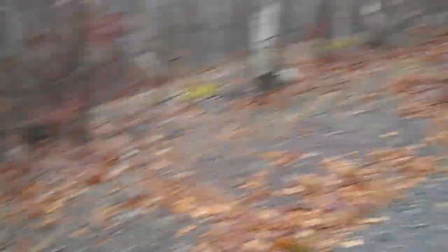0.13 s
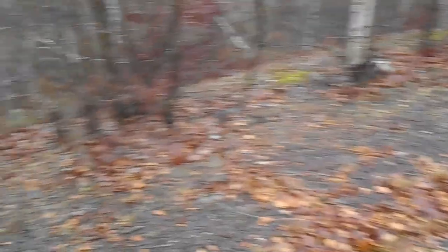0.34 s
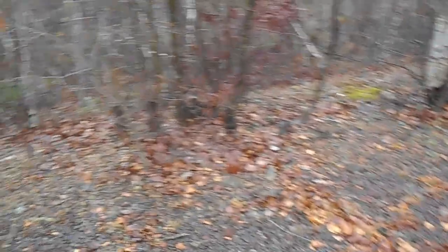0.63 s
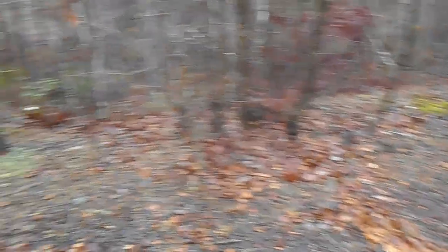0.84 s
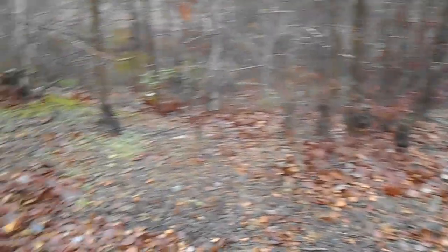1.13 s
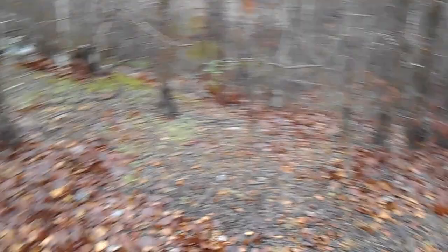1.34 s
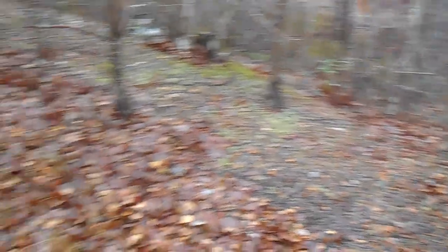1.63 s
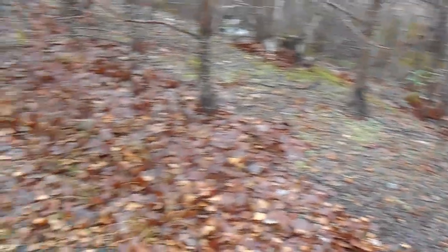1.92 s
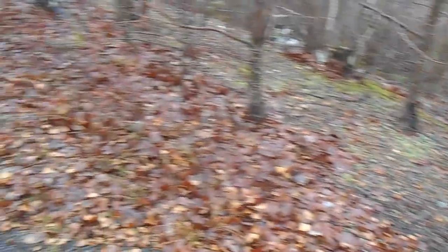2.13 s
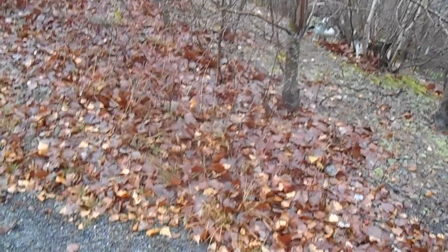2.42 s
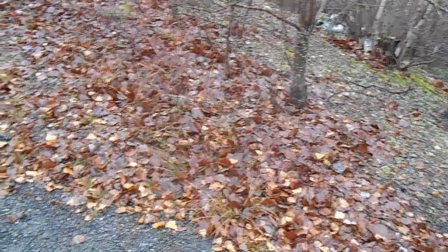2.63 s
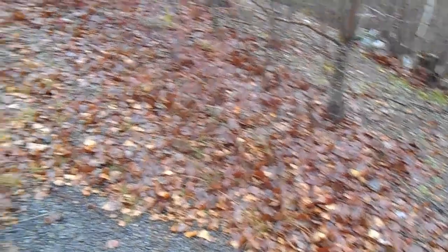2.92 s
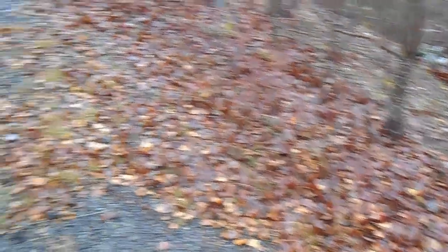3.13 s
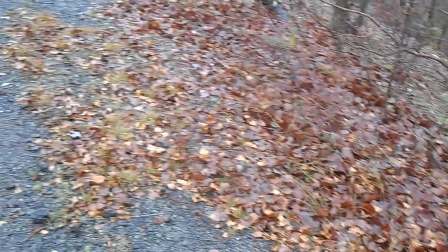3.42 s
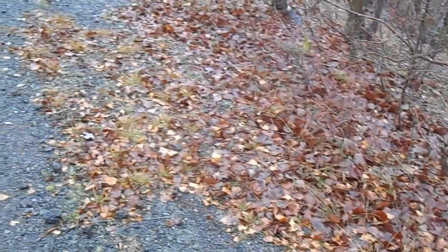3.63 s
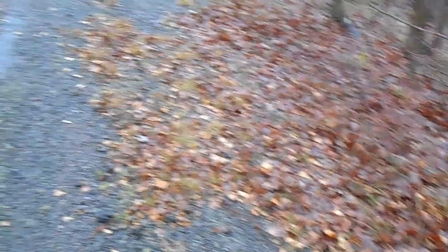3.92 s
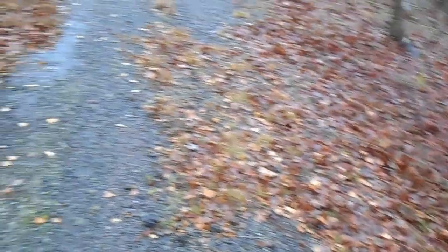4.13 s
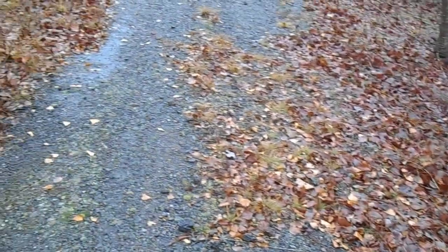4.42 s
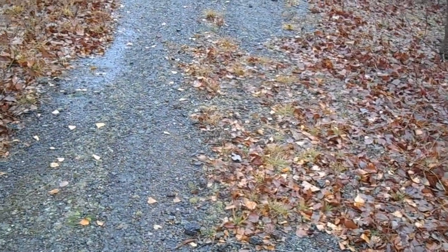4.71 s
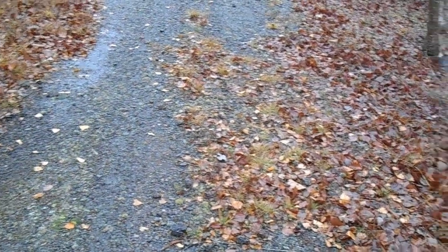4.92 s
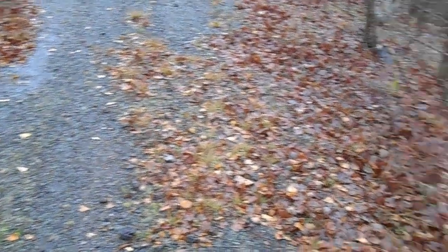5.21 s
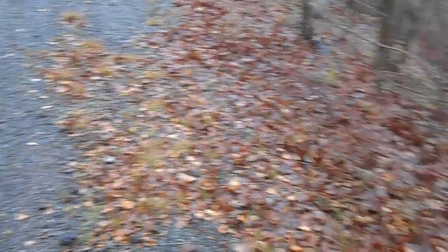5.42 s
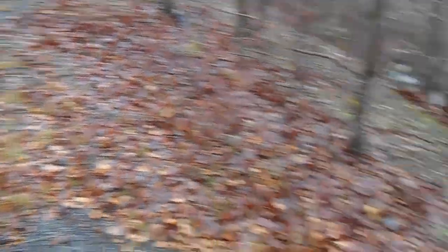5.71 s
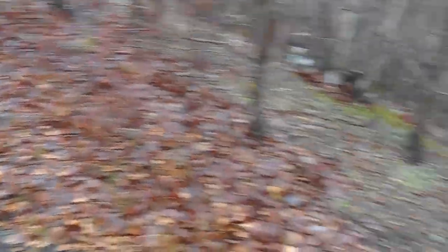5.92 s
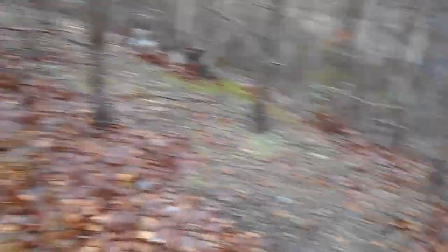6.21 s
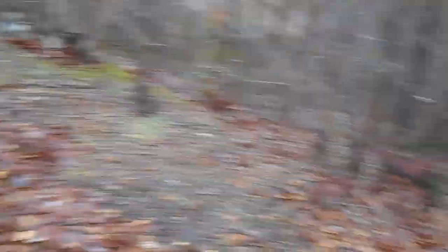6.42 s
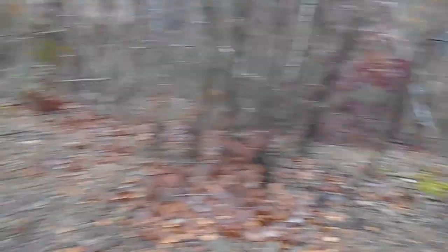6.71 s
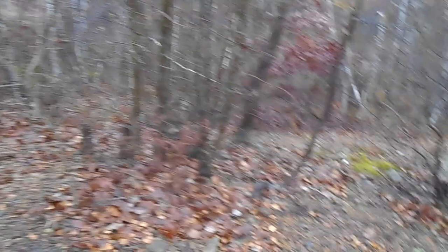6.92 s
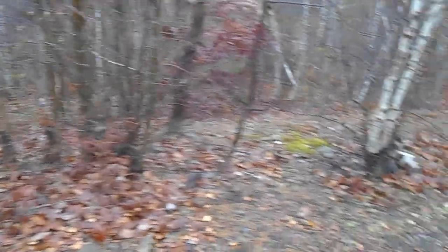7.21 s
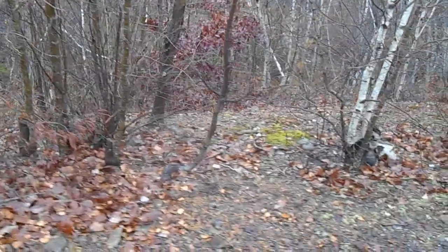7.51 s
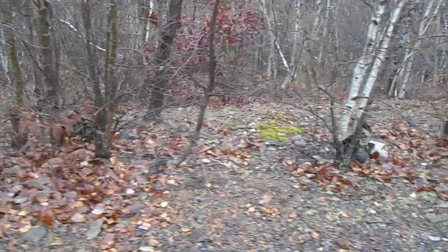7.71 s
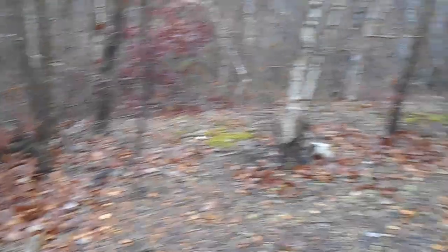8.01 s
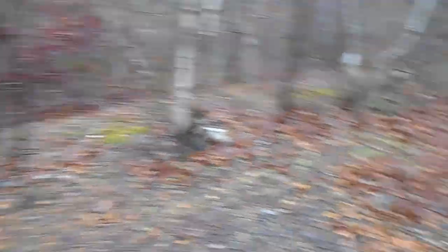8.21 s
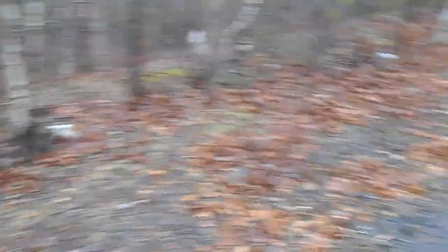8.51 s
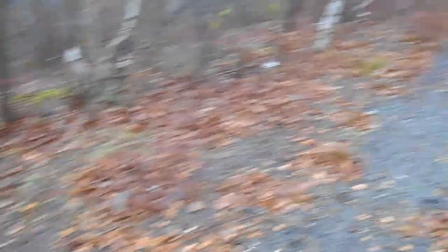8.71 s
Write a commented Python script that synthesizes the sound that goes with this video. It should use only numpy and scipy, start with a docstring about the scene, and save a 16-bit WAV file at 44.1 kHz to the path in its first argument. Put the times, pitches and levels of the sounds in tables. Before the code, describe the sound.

Close to a hand-held microphone outdoors, cloth like a rain jacket snaps, swishes and zips quickly up in pitch, followed by a sharp tap from a heavy drop and a short dull scrape. Around it, even rain hisses on woods and track, with scattered leaf pats and bright gravel ticks. Air rumbles quietly underneath, and soft thumps gather in the last second, both channels identical.

```python
"""Steady rain in bare woods: a far hiss, with nearer drops patting on soaked leaves and ticking on gravel.
Early on, ribbed cloth like a rain jacket snaps, swishes and zips upward close to the hand-held microphone;
a dull rustle follows. Air rumbles throughout, and the heaviest bumps on the microphone come near the end.
Filtered noise makes the hiss, patter and air; damped knocks make the drops and bumps; noise bands and
tones that follow the rib rate make the zip. One microphone, the same signal in both channels."""
import sys
import numpy as np
from scipy import signal
from scipy.io import wavfile

SR = 44100
rng = np.random.default_rng(int(sys.argv[2]) if len(sys.argv) > 2 else 0)


def persist_wave(psi):
    """Save psi, clipped to +-1, as 16-bit WAV."""
    counts = np.round(np.clip(psi, -1, 1) * 32767).astype(np.int16)
    wavfile.write(sys.argv[1], SR, np.atleast_2d(counts).T)


N = 390726
TIME = np.arange(N) / SR

# Air over the microphone, spectrum: f/Hz, relative density/dB per Hz
AIR_SPECTRUM = [(20, 0.5), (40, -5), (70, -9), (120, -14.5), (250, -22.5), (500, -35.5)]
# Gusts, before the air trim: t of the height/s, length/s, level/dB
AIR_GUSTS = [(.15, .35, -55), (.74, 0.23, -51), (1.0, 0.14, -53), (1.8, 0.24, -57.5), (3.5, .5, -60),
             (5.04, .35, -56.5), (6.07, .1, -57), (8.08, .26, -47), (8.46, 0.44, -53.5), (8.81, 0.18, -39)]
# Bumps on the microphone: t of the peak/s, peak level/dB, f/Hz
MICROPHONE_BUMPS = [(1.047, -45, 55), (8.049, -34, 115), (8.397, -42, 60), (8.477, -39, 70),
                    (8.7542, -25, 215), (8.781, -27.5, 190), (8.856, -30, 129)]
# Resonances of the microphone housing: f/Hz, width/Hz, boost/dB
HOUSING_RESONANCES = [(860, 180, 2.5), (1380, 160, 3), (2350, 130, 1), (3460, 260, 1.5)]

# Cloth brushing close by, spectrum: f/Hz, relative density/dB per Hz
BRUSH_SPECTRUM = [(800, -15), (2500, 7.5), (4700, 7), (7000, 3), (8200, -10.5)]
# Cloth fibres scratching, spectrum: f/Hz, relative density/dB per Hz
FIBRE_SPECTRUM = [(300, -9), (900, -14), (1800, 0.5), (2700, 5), (4000, -20), (5000, -5), (6600, -3.5),
                  (8200, -29)]
# Folds rubbing at other rates: f/multiple of the rib rate, level/dB relative to the scratch before trim
CLOTH_FOLDS = [(0.551, -10.5), (1.421, -5.5), (2, -6), (2.9, -7.5)]
# Ribs locking into a whistle at speed: t of the height/s, length/s, level/dB
RIB_WHISTLES = [(.358, 0.01, -28), (.374, 0.016, -28)]

# Rain as the microphone turns between leaves and track, all before the layer trims:
# t/s, far hiss level/dB, dull patter level/dB, distinct pats level/dB
RAIN_LEVELS = [(0.42, -49, -52.5, -52), (1.27, -50.5, -57.5, -53.5), (1.43, -49, -57, -54.5),
               (2.66, -50, -60, -57), (2.98, -50, -57, -58), (4.38, -50.5, -60.5, -58),
               (5.98, -50, -64, -58.5), (6.55, -50.5, -60.5, -58), (7.66, -50, -61.5, -55.5),
               (7.98, -50.5, -60.5, -59.5), (8.7, -49.5, -60.5, -55)]
# Brief showers of drips on the leaves, before the layer trims: t of the height/s, length/s, level/dB
DRIP_SHOWERS = [(2.22, 0.69, -57), (3.08, 0.23, -55), (7.55, 0.28, -59), (8.38, .2, -55.5)]
# Far rain, spectrum: f/Hz, relative density/dB per Hz
HISS_SPECTRUM = [(100, -8), (240, -9), (450, -10), (800, -4), (1150, -4.5), (1800, 0), (2400, 0.85),
                 (3300, 3.5), (4300, -1), (5600, -1), (7000, -4.5), (8200, -24.5)]
# Many pats further off, run together, spectrum: f/Hz, relative density/dB per Hz
PATTER_SPECTRUM = [(150, -6), (300, -4), (550, 1.5), (900, -6), (1400, -9), (2500, -14)]
# Scattered pats, loudness by pitch: f/Hz, relative level/dB
PAT_LOUDNESS = [(380, -6.5), (520, -4.5), (850, 3), (1300, 3), (2000, -0.5)]
# Near drops on soaked leaves: t/s, level before trim/dB, f/Hz
NEAR_LEAF_DROPS = [(0.074, -27.5, 1360), (0.083, -27.5, 740), (0.263, -34, 1030), (0.573, -37, 557),
                   (1.027, -34.5, 861), (1.053, -28.5, 575), (1.428, -32, 1430), (1.443, -29.5, 1820),
                   (1.462, -34.5, 756), (1.844, -32, 1600), (1.883, -33, 926), (2.118, -32, 528),
                   (2.271, -36, 517), (2.865, -33.5, 934), (3.022, -35, 759), (3.212, -29, 740),
                   (3.221, -33, 1690), (3.428, -34.5, 595), (3.878, -36, 899), (4.056, -34, 1000),
                   (4.417, -37.5, 720), (4.565, -33, 888), (4.594, -33, 1120), (6.463, -37, 1480),
                   (6.474, -33, 974), (6.799, -35, 2300), (7.174, -30, 934), (7.914, -30.5, 830),
                   (8.079, -30.5, 1550), (8.264, -34, 820), (8.508, -29, 1990), (8.558, -32, 1320)]
# Near drops on gravel: t/s, level before trim/dB, f/Hz
NEAR_GRAVEL_DROPS = [(1.9879, -30.5, 3260), (3.0396, -26.5, 5500), (3.0855, -31, 5300), (3.1202, -24, 6000),
                     (3.34, -27.5, 4870), (3.4809, -27, 3730), (3.6376, -32, 4970), (4.2786, -35, 3430),
                     (5.2995, -28.5, 3420), (6.474, -28, 3130), (8.313, -32, 3530)]
# Hard thing close by, ringing under one heavy drop: f/Hz, relative level/dB, decay by 60 dB/s
HARD_SURFACE_MODES = [(816, -10, 0.0095), (2040, 1, .007), (3600, -11.5, 0.01)]


def from_db(db):
    """Decibels to gain."""
    return 10 ** (np.asarray(db) / 20)


def rms_one(x):
    """Scale to rms 1."""
    return x / np.sqrt(np.mean(x ** 2) + 1e-20)


def in_time(rows):
    """The columns of a curve at every sample."""
    s, *columns = np.transpose(rows)
    return [np.interp(TIME, s, c) for c in columns]


def at_hz(points, hz):
    """Read a spectrum on a log-frequency axis."""
    f, level = np.transpose(points)
    return np.interp(np.log(hz), np.log(f), level)


def add(out, s, sound):
    """Mix a sound in at a time."""
    i = max(int(s * SR), 0)
    out[i:i + len(sound)] += sound[:max(N - i, 0)]


def envelope(start_s, attack_s, hold_s, release_s):
    """Straight attack, hold and release; height 1."""
    corners = start_s + np.cumsum([0, attack_s, hold_s, release_s])
    return np.interp(TIME, corners, [0, 1, 1, 0])


def swells(rows):
    """Bell-shaped swells of gain, each with its time, length and level."""
    total = 0
    for s, length, db in rows:
        bell = np.exp(-np.minimum((2 * (TIME - s) / length) ** 2, 20))
        total = total + from_db(db) * bell
    return total


def drift(rate_hz):
    """Slow random wandering of spread 1: noise through a two-pole low-pass."""
    step = 40   # drawn at every 40th sample, joined by straight lines
    r = np.exp(-2 * np.pi * rate_hz * step / SR)
    white = rng.standard_normal(N // step + 2002)
    slow = signal.lfilter([1], [1, -2 * r, r * r], white)[2000:]   # drop the filter's run-in
    return np.interp(np.arange(N) / step, np.arange(len(slow)), rms_one(slow))


def banded_noise(spectrum, flicker_db, flicker_hz):
    """Third-octave bands of noise, each flickering by itself; rms 1."""
    out, white = 0, rng.standard_normal((2, N))
    edges = np.geomspace(20, 10000, 28)
    for k, (low, high) in enumerate(zip(edges, edges[1:])):
        hz = np.sqrt(low * high)
        if spectrum[0][0] / 2 < hz < spectrum[-1][0] * 2:
            sos = signal.butter(2, [low, high], "band", fs=SR, output="sos")
            band = signal.sosfilt(sos, white[k % 2])   # neighbours use separate noise
            out = out + band * from_db(at_hz(spectrum, hz) + flicker_db * drift(flicker_hz))
    return rms_one(out)


def gliding_noise(hz, width_hz):
    """A narrow band of noise that follows a moving pitch; rms about 1."""
    phase = 2 * np.pi * np.cumsum(hz) / SR
    return drift(width_hz) * np.sin(phase) + drift(width_hz) * np.cos(phase)


def blip(hz, rise_cycles, phase):
    """A heavily damped knock: its envelope swells to 1 within a cycle or few, then dies away."""
    rise = rise_cycles / hz
    t = np.arange(int(8 * rise * SR) + 2) / SR
    push = (t / rise * np.exp(1 - t / rise)) ** 2
    return push * np.cos(2 * np.pi * hz * (t - rise) + phase)


def spray(decay_s):
    """A short bright noise burst that dies at once."""
    t = np.arange(SR // 40) / SR
    bright = signal.butter(1, [1500, 7000], "band", fs=SR, output="sos")
    return signal.sosfilt(bright, rng.standard_normal(len(t))) * np.exp(-t / decay_s)


def microphone_rumble(air_trim_db, cycles):
    """Lumpy low air noise swells in gusts; soft bumps push on the microphone as damped knocks."""
    calm_db = -61.5   # between gusts, before the trim
    air_gain = from_db(air_trim_db) * np.hypot(from_db(calm_db), swells(AIR_GUSTS))
    out = air_gain * banded_noise(AIR_SPECTRUM, flicker_db=3.0, flicker_hz=6)
    for s, db, hz in MICROPHONE_BUMPS:
        add(out, s - cycles / hz, from_db(db) * blip(hz, cycles, np.pi))
    return out


def rustle(width_hz):
    """A dull scrape: a noise band sinks in pitch and trails off."""
    start_s, sink_s = 1.415, .058
    high_hz, low_hz = 1733, 560
    sinking = np.exp(-np.maximum(TIME - start_s, 0) / sink_s)
    centre_hz = low_hz + (high_hz - low_hz) * sinking
    contact = envelope(start_s, attack_s=0.028, hold_s=0.19, release_s=0.057)
    return from_db(-52.5) * contact * gliding_noise(centre_hz, width_hz)


def brush(crack_db, crack_s, cycles):
    """The cloth brushes as a noise swell and snaps as a knock with a bright burst, before it slides."""
    snap_s, snap_db, snap_hz = .1738, -29, 740
    contact = envelope(start_s=.17, attack_s=0.022, hold_s=0.011, release_s=0.049)
    out = from_db(-42.5) * contact * banded_noise(BRUSH_SPECTRUM, flicker_db=1.0, flicker_hz=76)
    start = snap_s - cycles / snap_hz   # the knock peaks at snap_s
    add(out, start, from_db(snap_db) * blip(snap_hz, cycles, 0))
    add(out, start, from_db(crack_db) * spray(crack_s))
    return out


def rib_rate():
    """Ribs passed per second: the slide slows at first, then quickens along an S."""
    slow_hz, fast_hz = 270, 2890
    middle_s, time_scale_s = .346, .0215   # of the quickening
    slowest_s, slowing_hz_per_s = .268, 3500
    rise = .5 * (1 + np.tanh(.5 * (TIME - middle_s) / time_scale_s))
    early = slowing_hz_per_s * np.maximum(slowest_s - TIME, 0)
    return slow_hz + (fast_hz - slow_hz) * rise + early


def cloth_slide(wobble, rib_width_hz, fold_width_hz, grit_db):
    """Sliding over ribs gives a tone at the rib rate, rising into a whistle, amid scratching."""
    rib_hz = rib_rate()
    contact = envelope(start_s=.21, attack_s=0.047, hold_s=0.11, release_s=0.031)
    phase = 2 * np.pi * np.cumsum(rib_hz * (1 + wobble * drift(150))) / SR
    whistle = np.sqrt(2) * swells(RIB_WHISTLES) * np.sin(phase)
    rib_tone = from_db(-46) * contact * gliding_noise(rib_hz, rib_width_hz)
    # loose folds catch and let go unevenly, so their lines are blurred
    folds = sum(from_db(db) * gliding_noise(multiple * rib_hz, fold_width_hz)
                for multiple, db in CLOTH_FOLDS)
    rib_beat = rms_one(1 + 0.24 * np.sin(phase))
    fibres = banded_noise(FIBRE_SPECTRUM, flicker_db=0.5, flicker_hz=48) * rib_beat
    # loudest at 1370 ribs a second, 3.8 dB weaker an octave away
    scratch_db = -36.5 - 3.8 * np.log2(rib_hz / 1370) ** 2
    scratch_gain = contact * from_db(scratch_db + grit_db * drift(200))
    return whistle + rib_tone + scratch_gain * from_db(-1.0) * (fibres + folds)


def far_hiss(hiss_db, flurry_db):
    """Countless far drops merge into broad noise."""
    return from_db(hiss_db + 0.13 + flurry_db) * banded_noise(HISS_SPECTRUM, flicker_db=0.8, flicker_hz=20)


def leaf_patter(patter_db, showers, flurry_db):
    """Many pats further off run together into dull, uneven noise."""
    gain = np.hypot(from_db(patter_db), showers) * from_db(-0.7 + 2.6 * flurry_db)
    return gain * banded_noise(PATTER_SPECTRUM, flicker_db=2.7, flicker_hz=31)


def scattered_drops(per_s, pitches, cycles, spread_db, colour):
    """Knocks land at random; a few louder, closer ones stand out of the many further off; rms 1."""
    out = np.zeros(N)
    draws = rng.random((int(per_s * N / SR), 4))
    for when, pitch, nearness, turn in draws:
        hz = pitches[0] * (pitches[1] / pitches[0]) ** pitch
        size_db = spread_db * min(-np.log(1 - nearness), 4)
        gain = from_db(size_db + at_hz(colour, hz))
        add(out, when * N / SR, gain * blip(hz, cycles, 2 * np.pi * turn))
    return rms_one(out)


def gravel_ticks(hiss_db):
    """Fine high knocks on gravel, following the level of the hiss."""
    colour = [(2000, -3.0), (3400, 0.7), (8000, 2.0)]   # f/Hz, relative level/dB
    return from_db(hiss_db - 5.5) * scattered_drops(
        per_s=420, pitches=(2000, 8000), cycles=1.596, spread_db=4.0, colour=colour)


def leaf_pats(pats_db, showers):
    """Distinct dull knocks on soft leaves, denser in sound as showers of drips swell."""
    gain = np.hypot(from_db(pats_db), from_db(-2.5) * showers) * from_db(-0.64)
    return gain * scattered_drops(
        per_s=300, pitches=(380, 2000), cycles=0.44, spread_db=3.5, colour=PAT_LOUDNESS)


def near_drops(rows, trim_db, cycles, stiffening, spray_db, spray_s):
    """Each drop gives one push of pressure with a droplet spray; above 1 kHz it rings more cycles."""
    impact_s = .002   # from the listed time to the peak of the push
    out = np.zeros(N)
    for s, db, hz in rows:
        rise_cycles = cycles * max(hz / 1000, 1) ** stiffening
        start = s + impact_s - rise_cycles / hz
        add(out, start, from_db(db + trim_db) * blip(hz, rise_cycles, 0))
        add(out, start, from_db(db + spray_db) * spray(spray_s))
    return out


def heavy_drop(spray_db, spray_s, low_cut_hz):
    """One heavy drop strikes something hard close by: a dry tap sets three short modes ringing."""
    out, t = np.zeros(N), np.arange(SR // 40) / SR
    ring = sum(from_db(db - 60 * t / t60) * np.sin(2 * np.pi * hz * t)
               for hz, db, t60 in HARD_SURFACE_MODES)
    ring = signal.sosfilt(signal.butter(1, low_cut_hz, "high", fs=SR, output="sos"), ring)
    add(out, .7909, from_db(-15) * (ring + from_db(spray_db) * spray(spray_s)))
    return out


def rain():
    """Rain from far to near: hiss, patter, ticks and pats, then the single nearest drops."""
    hiss_db, patter_db, pats_db = in_time(RAIN_LEVELS)
    showers = swells(DRIP_SHOWERS)
    flurry_db = 0.55 * drift(30)   # hiss and patter waver together
    far = far_hiss(hiss_db, flurry_db) + leaf_patter(patter_db, showers, flurry_db)
    middle = gravel_ticks(hiss_db) + leaf_pats(pats_db, showers)
    on_leaves = near_drops(NEAR_LEAF_DROPS, trim_db=-1.0, cycles=.55, stiffening=.75,
                           spray_db=-18, spray_s=0.0042)
    on_gravel = near_drops(NEAR_GRAVEL_DROPS, trim_db=-1.5, cycles=0.53, stiffening=0.87,
                           spray_db=-4.5, spray_s=0.0027)
    on_hard = heavy_drop(spray_db=-19, spray_s=0.00097, low_cut_hz=510)
    return far + middle + on_leaves + on_gravel + on_hard


def scene():
    """One microphone feeds both channels."""
    rumble = microphone_rumble(air_trim_db=-2.0, cycles=0.36)
    snap_and_brush = brush(crack_db=-20.5, crack_s=0.0013, cycles=0.46)
    slide = cloth_slide(wobble=.012, rib_width_hz=50, fold_width_hz=110, grit_db=1.0)
    mono = rumble + rustle(width_hz=250) + snap_and_brush + slide + rain()
    return np.stack([mono, mono])


def record(dry):
    """The microphone housing lifts a few narrow bands; the top is cut steeply."""
    cutoff_hz = 8100
    for hz, width_hz, boost_db in HOUSING_RESONANCES:
        resonance = signal.lfilter(*signal.iirpeak(hz, hz / width_hz, fs=SR), dry)
        dry = dry + (from_db(boost_db) - 1) * resonance
    return signal.sosfilt(signal.ellip(12, .2, 70, cutoff_hz, fs=SR, output="sos"), dry)


dry = scene()
out = record(dry)
persist_wave(out)
```